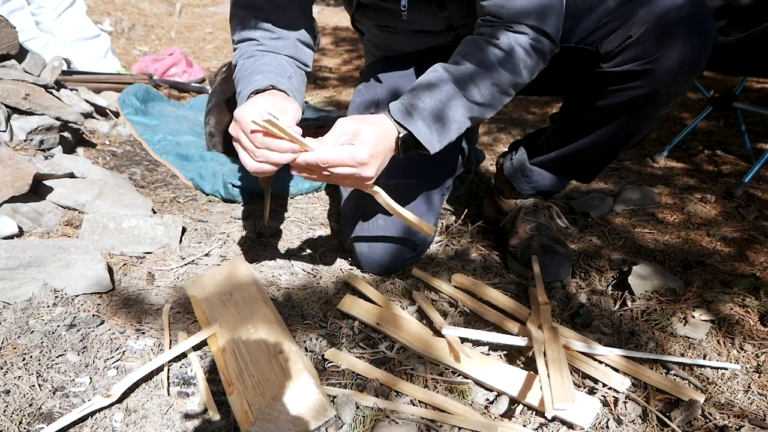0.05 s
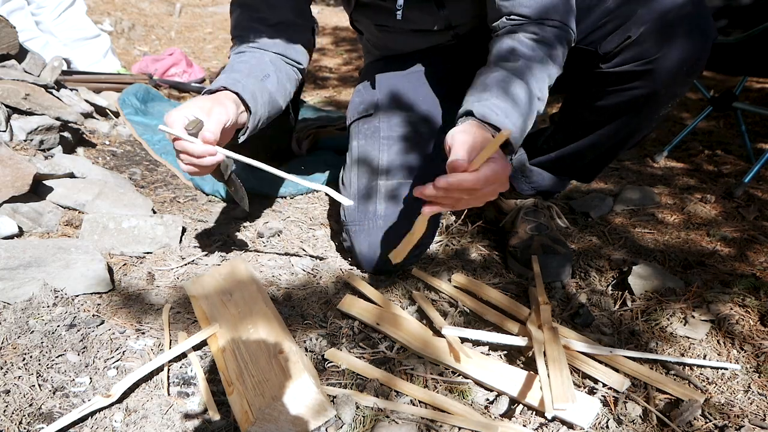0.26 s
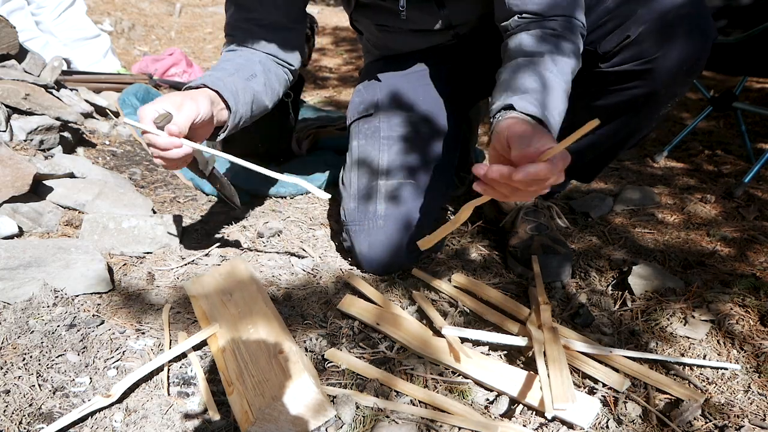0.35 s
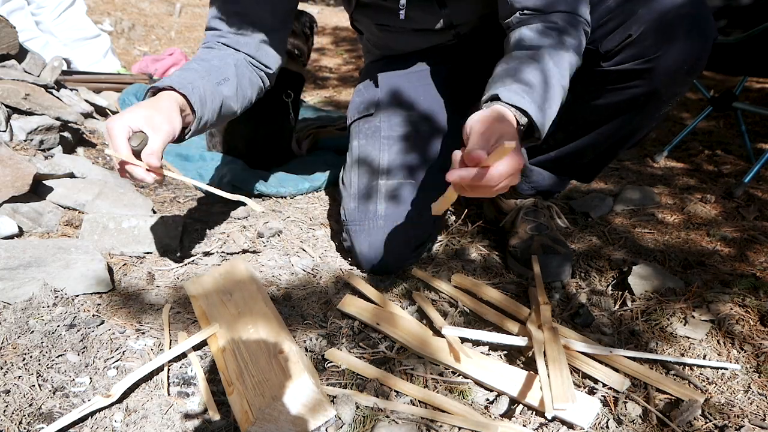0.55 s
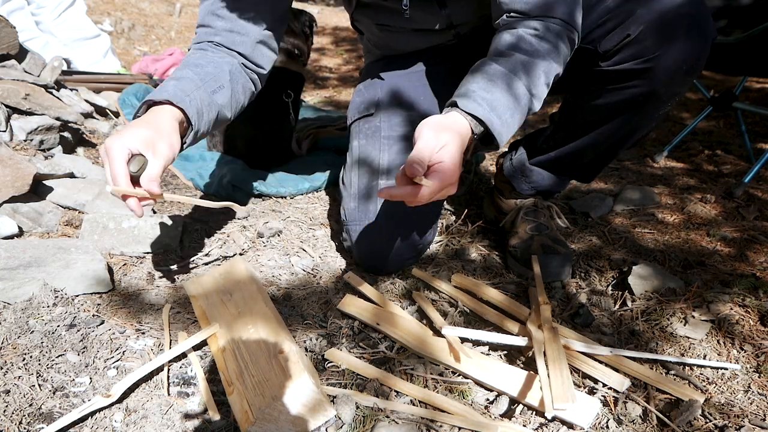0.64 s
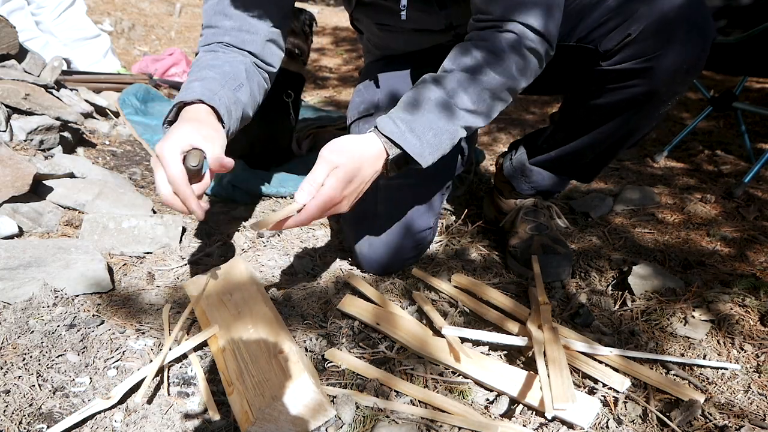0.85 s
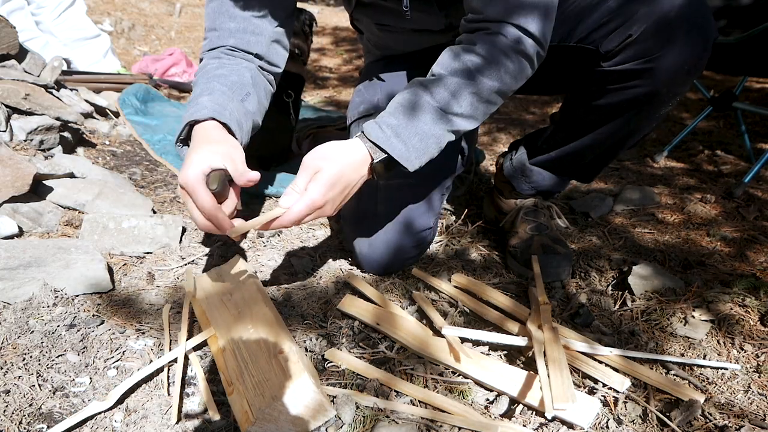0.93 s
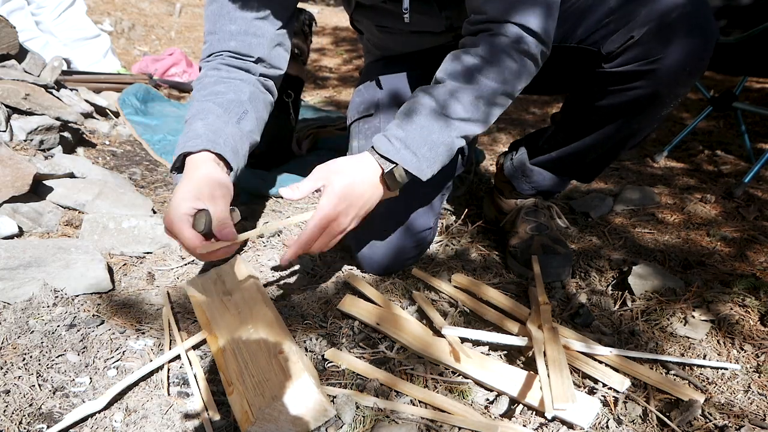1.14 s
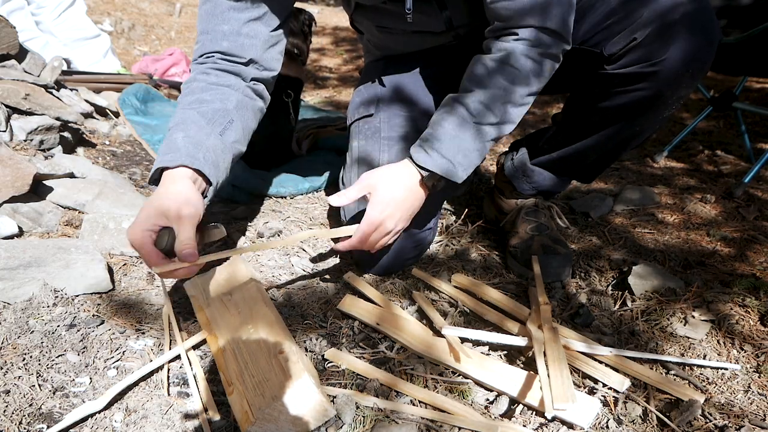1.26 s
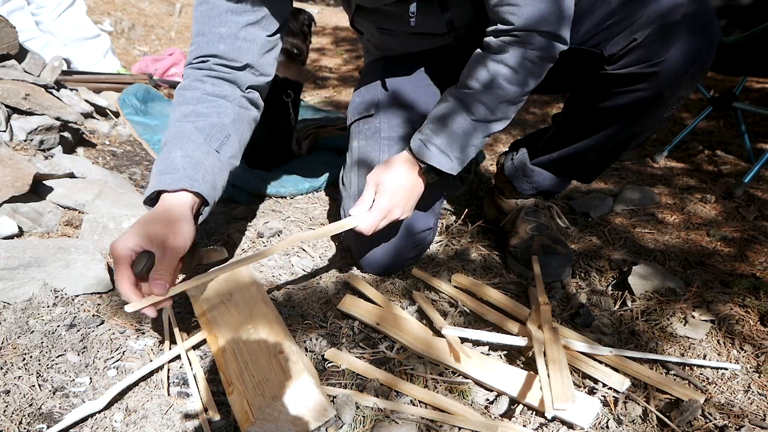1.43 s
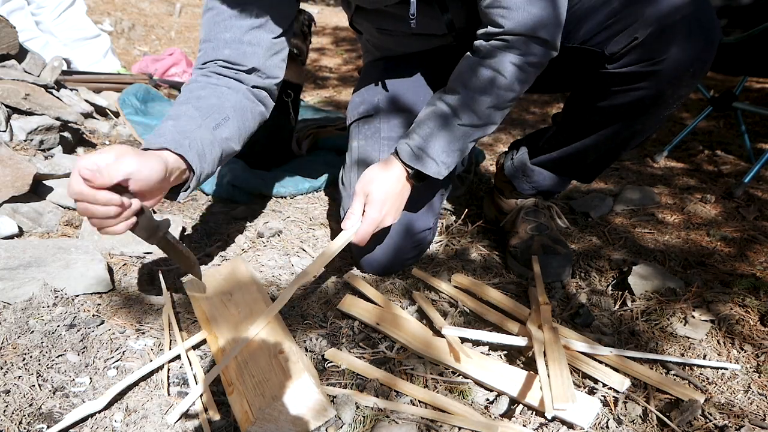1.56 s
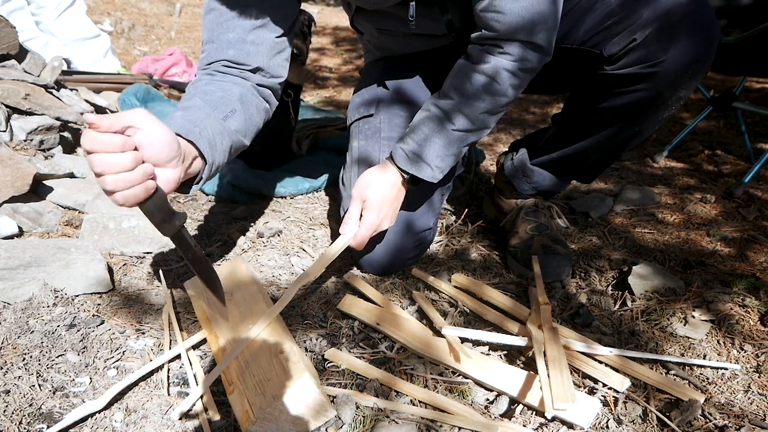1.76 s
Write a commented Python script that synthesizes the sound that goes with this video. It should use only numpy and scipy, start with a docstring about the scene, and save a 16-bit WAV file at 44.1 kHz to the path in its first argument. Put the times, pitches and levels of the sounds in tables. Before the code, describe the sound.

Dry wood tears and snaps with a sharp crack as kindling is split outdoors.

```python
"""A soft outdoor wash and a little wind on the microphone open on a campsite where kindling is made by
hand. A thin strip of dry softwood tears off in a quick run of fibre snaps; a moment later a stick
breaks with one ringing crack, and the pieces knock lightly together. Each snap is a click with a
short scatter inside the wood, over the piece's dying modes. Sleeves rustle as the arms move."""
import sys
import numpy as np
from scipy import signal
from scipy.io import wavfile
from scipy.ndimage import uniform_filter1d

SR = 44100
rng = np.random.default_rng(int(sys.argv[2]) if len(sys.argv) > 2 else 0)


def waveform_to_disk(signal):
    """Save audio, clipped to [-1, 1], as 16-bit WAV at the path in sys.argv[1]."""
    frames = np.transpose(np.atleast_2d(signal))
    scaled = np.clip(frames, -1, 1) * 32767
    samples = np.round(scaled).astype(np.int16)
    wavfile.write(sys.argv[1], SR, samples)


N = 79380
TIME = np.arange(N) / SR
T = np.arange(SR // 6) / SR  # time within one hit [s]
HZ = np.fft.rfftfreq(4096, 1 / SR)

# the stick's modes, rung by the break and the knocks (frequency [Hz], level [dB], t60 [s])
STICK_MODES = [(1114, -15, .06), (1710, -10, .02), (1920, -0.5, 0.057), (2073, -12.5, 0.053),
               (2935, -13, 0.083), (3750, -13, 0.05), (4590, -11, 0.049), (4800, -29, .05),
               (5350, -5.5, 0.043), (6912, -9, 0.017)]


def amp(db):
    """Decibels to gain."""
    return 10 ** (np.asarray(db) / 20)


def unit(x):
    """Scales to rms 1."""
    return x / np.sqrt(np.mean(x ** 2) + 1e-20)


def spectrum(points, hz=HZ):
    """Reads (frequency [Hz], level [dB]) points as an EQ curve in dB, on a log-frequency axis."""
    f, db = np.transpose(points)
    return np.interp(np.log(hz + 1), np.log(f + 1), db)


def level(points):
    """Reads (time [s], level [dB]) points as a gain curve."""
    return amp(np.interp(TIME, *np.transpose(points)))


def add(mix, s, sound):
    """Mixes a sound in at s seconds."""
    part = mix[max(round(s * SR), 0):][:len(sound)]
    part += sound[:len(part)]


def click(db):
    """A minimum-phase click with the given spectrum; its envelope peaks at 1."""
    log_gain = np.log(amp(np.r_[db, db[-2:0:-1]]))
    response = np.exp(np.conj(signal.hilbert(log_gain)))
    pulse = np.fft.ifft(response).real[:len(db) // 2]
    return pulse / abs(signal.hilbert(pulse)).max()


def snap(db, tail_db, t60):
    """A click followed by its quickly dying scatter inside the wood."""
    scatter = rng.standard_normal(len(T)) * amp(-60 * T / t60) * (1 - np.exp(-T / .0003))
    drive = amp(tail_db) * scatter / np.linalg.norm(scatter)
    drive[0] += 1
    return signal.fftconvolve(drive, click(db))[:len(T)]


def ring(modes, tilt_db=0):
    """Wood modes build up briefly and die away, tilted in dB per octave about 2 kHz."""
    tone = np.zeros(len(T))
    for k, (hz, db, t60) in enumerate(modes):
        decay = amp(db + tilt_db * np.log2(hz / 2000) - 60 * T / t60)
        tone += decay * np.sin(2 * np.pi * hz * T + k * np.pi)
    attack = 1 - np.exp(-T / .00037)
    low_cut = signal.butter(3, 850, "high", fs=SR, output="sos")  # thin wood radiates no bass
    return signal.sosfilt(low_cut, tone * attack)


def noise(colour, patchy_db, size):
    """Coloured noise whose level drifts in patches over time and frequency."""
    hz = np.fft.rfftfreq(size, 1 / SR)
    real, imag, patches = rng.standard_normal((3, 4 * N // size + 5, len(hz)))
    patches = uniform_filter1d(patches, size=7, axis=0)
    patches = unit(uniform_filter1d(patches, size=11, axis=1))
    frames = (real + 1j * imag) * amp(spectrum(colour, hz) + patchy_db * patches)
    _, sound = signal.istft(frames.T, nperseg=size, noverlap=size - size // 4)
    return unit(sound[:N])


def outdoors():
    """A steady wash, a soft midrange hiss that dies away early, and low wind on the microphone."""
    # colours of the three layers (frequency [Hz], level [dB])
    wash_colour = [(100, -3.5), (280, -5.5), (480, -0.5), (900, 0), (1400, -2.5), (2200, -10.5),
                   (3200, -19.5), (8000, -23.5), (10000, -27.5), (14000, -29), (16000, -32)]
    hiss_colour = [(600, -24), (1400, -1), (2300, 3), (2700, -4.5), (3300, -19), (6000, -48)]
    wind_colour = [(8, -3), (25, 4), (45, -9), (75, -10.5), (120, -18), (200, -27.5), (400, -39.5),
                   (1500, -79)]
    # the hiss's fade and the wind's gentle swell (time [s], level [dB])
    hiss_fade = [(0, -53), (.25, -51.5), (.5, -57), (.75, -68), (1.8, -96)]
    wind_swell = [(0, 0.45), (.45, 0.92), (.87, 2.4), (1.15, -1.4), (1.8, -3.5)]
    wash = amp(-48) * noise(wash_colour, patchy_db=2, size=1024)
    hiss = level(hiss_fade) * noise(hiss_colour, patchy_db=2, size=1024)
    wind = amp(-42.5) * level(wind_swell) * noise(wind_colour, patchy_db=1.5, size=4096)
    return wash + hiss + wind


def sleeves():
    """Grainy friction of jacket cloth, swelling with each move of the arms."""
    # colour of rubbing cloth (frequency [Hz], level [dB])
    cloth_colour = [(300, -8.5), (1200, 5), (2500, 0.5), (5000, -0.5), (6500, -3.5), (8400, 0.5),
                    (9800, -9.5), (13500, -10), (16000, -19)]
    # swells of the rustle (time [s], level [dB])
    arm_moves = [(0, -85), (.15, -62), (.3, -54.5), (.41, -50.5), (.47, -55), (.55, -47.5), (.66, -47.5),
                 (.72, -57.5), (.85, -54.5), (1.06, -55), (1.13, -57.5), (1.23, -58.5), (1.33, -47.5),
                 (1.42, -52), (1.53, -52), (1.62, -55.5), (1.73, -57.5), (1.8, -96)]
    grain_db = unit(uniform_filter1d(rng.standard_normal(N), size=60))
    rustle = noise(cloth_colour, patchy_db=2, size=512) * amp(grain_db)
    return level(arm_moves) * unit(rustle)


def tear():
    """Fibres snap one after another along the grain, with fine crackle between; the strip rings along."""
    # fibre snaps (time [s], level [dB], thickness [0 thin to 1 thick])
    fibres = [(.1780, -16.5, 0.1), (.1812, -27, 0), (0.194, -19.5, 0), (0.2011, -22, 0.13), (.2043, -22, 0),
              (.2054, 2, 0), (0.2063, -10, .2), (.2071, -20, .2), (0.2095, -20, 0), (0.2118, -5.5, 0.19),
              (.2150, -3.5, 0.17), (0.2183, -3.5, 0.31), (0.2189, -11, 0.48), (0.2218, -12, .5),
              (0.226, -12, 0.018), (0.2263, -8, 0.98), (0.2306, -9, 0.83), (0.2327, -7, 0.9),
              (0.2361, -3, 0.63), (0.2362, -5.5, 0.64), (.2375, 0.5, 1), (.2382, -5.5, 1),
              (0.2405, -7.5, 0.41), (0.2411, -12, 0.39), (.2458, -19, 0.82), (.2510, -20.5, .5),
              (.2571, -29, 0.13), (.2646, -31, .2), (.2679, -26, 0.09)]
    # colour of a snap (frequency [Hz], thin fibre level [dB], thick fibre level [dB])
    fibre_colour = [(300, -48, -41), (1100, -18.5, -20.5), (1760, -21, -7), (3520, -14, -4.5),
                    (4430, -3.5, 2.5), (5500, 0.5, 4), (6100, -2.5, -2.5), (8000, 3.5, -12),
                    (9600, -3.5, -4), (11000, -14.5, -9.5), (12500, -7, -5.5), (15200, -17.5, -12.5)]
    # modes of the torn strip (frequency [Hz], level [dB], t60 [s])
    strip_modes = [(1830, -44, 0.044), (3120, -33.5, 0.033), (4330, -26, 0.027), (4990, -32, 0.024),
                   (5580, -29, 0.022), (5682, -27, 0.03), (6860, -28, 0.034), (8020, -28.5, 0.034),
                   (8760, -27.5, 0.047)]
    hz, thin_db, thick_db = np.transpose(fibre_colour)
    thin, thick = spectrum(np.c_[hz, thin_db]), spectrum(np.c_[hz, thick_db])
    out, body = np.zeros(N), ring(strip_modes)
    for s, db, thickness in fibres:
        colour = thin + thickness * (thick - thin)
        add(out, s, amp(db) * (snap(colour, tail_db=-1, t60=.012) + body))
    start_s, release_s, fade_s, grains_per_s = .204, .246, .0083, 1500
    tearing = (TIME > start_s) * np.exp(-np.maximum(TIME - release_s, 0) / fade_s)
    grains = (rng.random(N) < grains_per_s / SR) * rng.choice([-1, 1], N)
    grain_gain = amp(3.5 * rng.standard_normal(N))
    crackle = signal.fftconvolve(grains * grain_gain * tearing, click((thin + thick) / 2))[:N]
    return out + amp(-27) * crackle


def ticks():
    """Handled wood and grit give small, dead ticks, each in its own band."""
    # contacts (time [s], level [dB], centre [Hz], half-width [octaves], t60 [s])
    contacts = [(.306, -36.5, 13300, .15, .012), (.3065, -36, 650, 0.84, 0.021),
                (.3275, -31, 1010, 0.69, .02), (.3345, -28, 13500, .4, .03),
                (0.3361, -28.5, 8000, 0.61, .02), (0.3394, -33, 2520, 1, 0.012),
                (0.3666, -23.5, 1260, 1.09, 0.014), (0.3682, -32, 1300, .9, 0.012),
                (0.376, -36, 1100, 0.67, .02), (.9509, -28, 13500, .4, .012),
                (.9525, -34, 4300, 0.73, .035), (0.994, -31, 1460, 0.33, 0.014),
                (1.046, -32, 910, 0.87, 0.018), (1.089, -34, 1190, 0.67, 0.015),
                (1.3905, -35.5, 690, 0.93, 0.042), (1.4538, -27.5, 3900, 0.67, 0.007),
                (1.454, -35, 900, 1.3, .03)]
    out = np.zeros(N)
    for s, db, hz, octaves, t60 in contacts:
        band = -10 * np.log10(1 + (np.log2((HZ + 1) / hz) / octaves) ** 10)
        add(out, s, amp(db) * snap(band, tail_db=-1.5, t60=t60))
    return out


def knocks():
    """The pieces knock lightly together: each contact clicks and rings the stick."""
    # knocks (time [s], level [dB], brightness [dB per octave])
    hits = [(0.8704, -36, -1), (0.9646, -37.5, -10), (.975, -44, -16), (0.9947, -35, -8),
            (1.046, -45.5, 1.5), (1.089, -46, 0.5), (1.158, -46.5, -1.5), (1.6837, -32.5, -10.5),
            (1.711, -63, -4), (1.7225, -42, -12.5), (1.7393, -44, -12), (1.752, -45, -13)]
    # colour of the contact click (frequency [Hz], level [dB])
    knock_colour = [(150, -14.5), (450, 0.5), (1200, -6.5), (1800, 7), (3000, -15), (8000, 9.5),
                    (15000, -6)]
    main_mode_hz = STICK_MODES[2][0]
    octaves_above = np.log2(np.maximum(HZ / main_mode_hz, 1))
    out = np.zeros(N)
    for s, db, tilt_db in hits:
        colour = spectrum(knock_colour) + tilt_db * octaves_above
        contact = amp(5) * snap(colour, tail_db=4, t60=.026)
        add(out, s, amp(db) * (ring(STICK_MODES, tilt_db) + contact))
    return out


def stick_break():
    """The stick gives way in a tight burst of fractures and rings; then a last splinter springs free."""
    # fractures that make up the crack (time [s], level [dB])
    fractures = [(0.9131, -27), (0.9147, -3.5), (0.915, -8), (.9160, -13.5), (0.9167, -3.5), (.9176, -14.5),
                 (0.9193, -25), (.9302, -28)]
    # colour of a fracture (frequency [Hz], level [dB])
    fracture_colour = [(300, -33), (800, -20), (1100, -9.5), (1800, 5.5), (2600, -3.5), (3700, -6.5),
                       (4150, -13), (4600, -6), (6200, -6.5), (6950, 7), (7700, -1), (10000, -14),
                       (13600, -10.5), (16000, -18)]
    # many weaker modes blur into a short wooden tail (frequency [Hz], level [dB])
    blur_colour = [(500, -31), (1100, 3), (2000, 0), (3200, -4), (5400, -12), (8000, -18), (15000, -26)]
    # modes of the splinter (frequency [Hz], level [dB], t60 [s])
    splinter_modes = [(3600, -9, 0.061), (4823, -13, .06), (5367, -1, 0.037), (7122, -2, 0.039),
                      (8942, -4.5, 0.034), (11900, -9, 0.031)]
    out = np.zeros(N)
    for s, db in fractures:
        add(out, s, amp(db) * snap(spectrum(fracture_colour), tail_db=0, t60=.017))
    blur = signal.fftconvolve(rng.standard_normal(len(T)), click(spectrum(blur_colour)))[:len(T)]
    blur = unit(blur) * amp(-60 * T / .08)  # t60 of 80 ms
    add(out, .9158, amp(-16) * ring(STICK_MODES) + amp(-26) * blur)
    add(out, .95, amp(-30.5) * ring(splinter_modes))
    return out


def echo(x, level_db=-25.5, t60=.15, cutoff_hz=4970):
    """Faint, dull scatter from rocks and trees."""
    tail = rng.standard_normal(len(T)) * amp(-60 * T / t60)
    tail = signal.lfilter(*signal.butter(1, cutoff_hz, fs=SR), tail)
    return amp(level_db) * signal.fftconvolve(x, tail / np.linalg.norm(tail))[:N]


def scene():
    """Wood close by, with cloth and open air around it, in mono."""
    wood = tear() + stick_break() + knocks() + ticks()
    return (wood + echo(wood) + sleeves() + outdoors())[None]


def record(dry):
    """Clips at full scale, then cuts the top end steeply near 16 kHz."""
    high_cut = signal.firwin(301, 15950, window=("kaiser", 8), fs=SR)
    return signal.oaconvolve(np.clip(dry, -1, 1), high_cut[None], "same")


dry = scene()
out = record(dry)
waveform_to_disk(out)
```